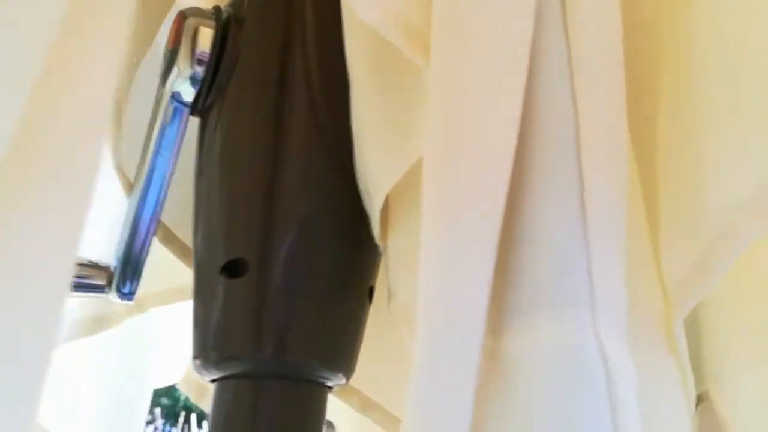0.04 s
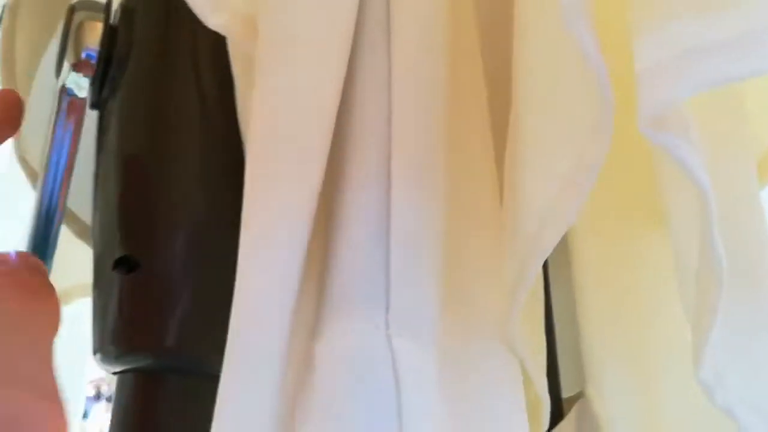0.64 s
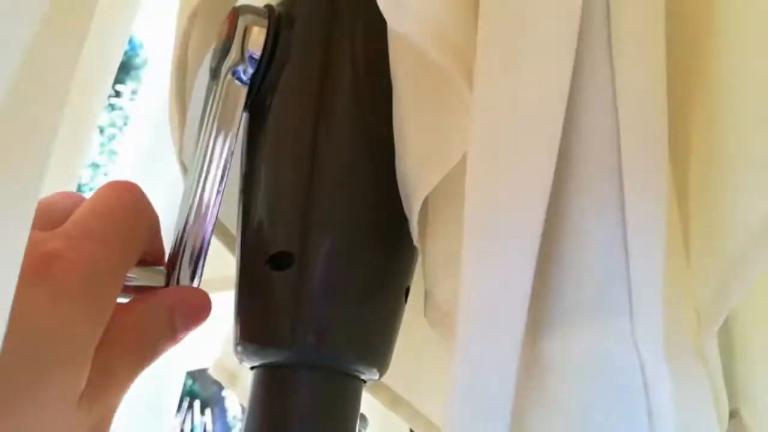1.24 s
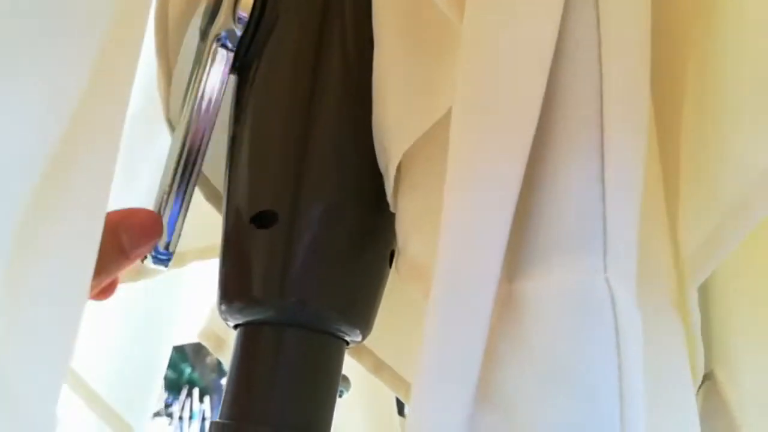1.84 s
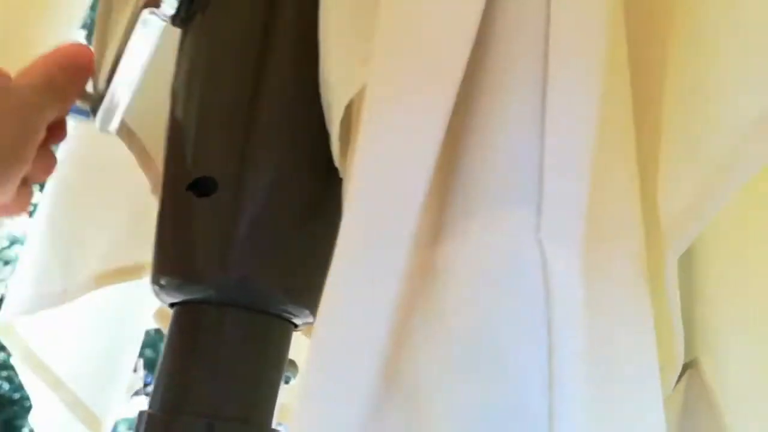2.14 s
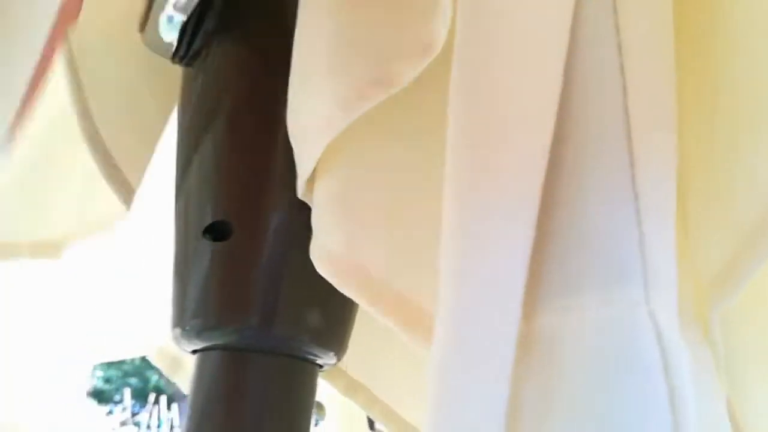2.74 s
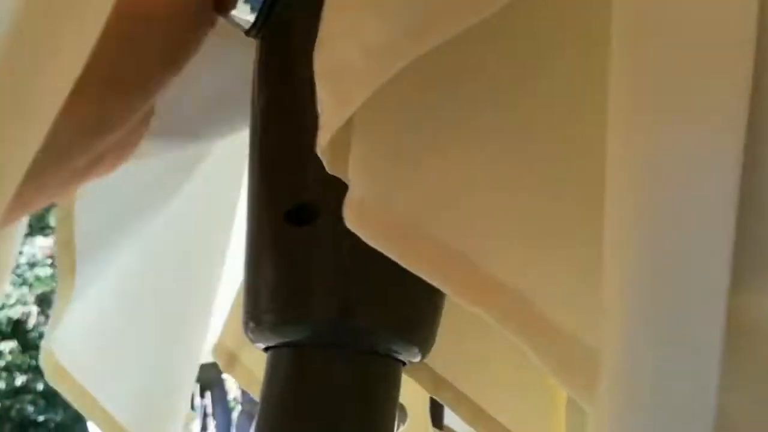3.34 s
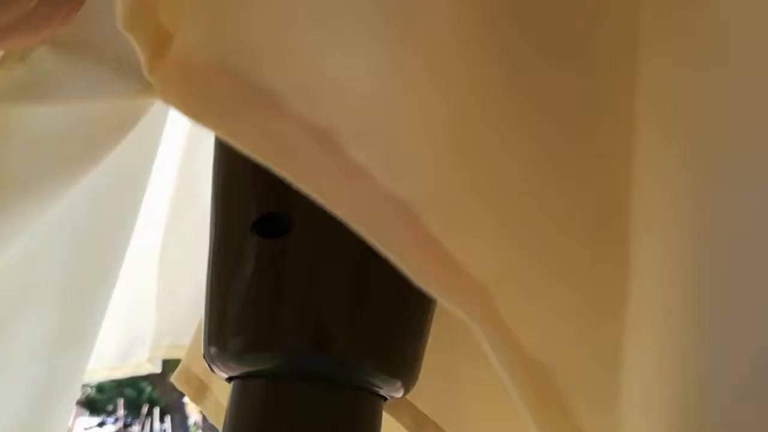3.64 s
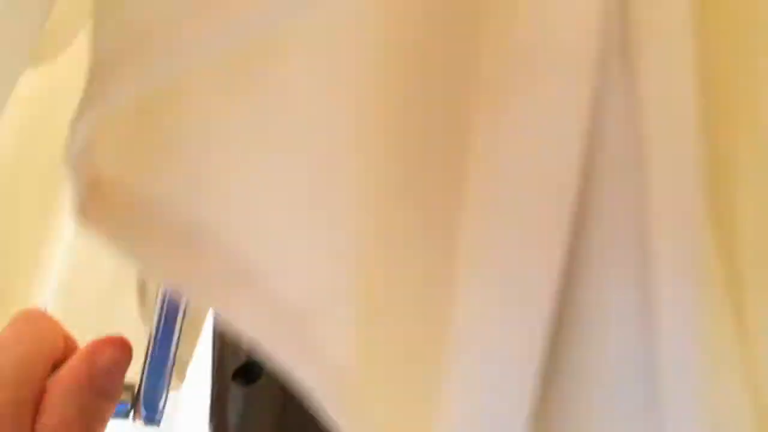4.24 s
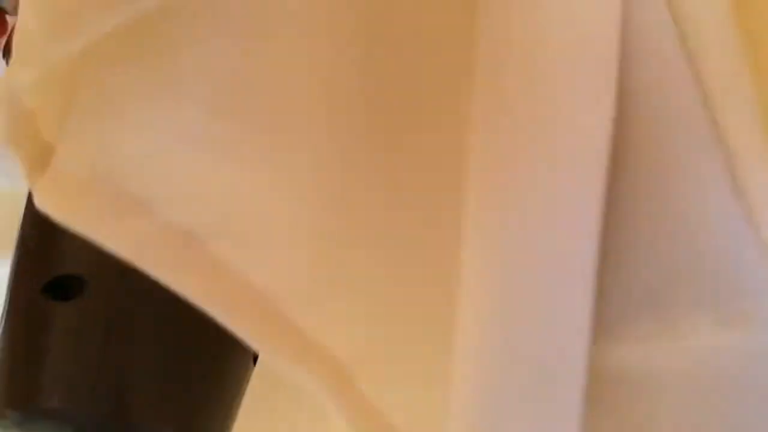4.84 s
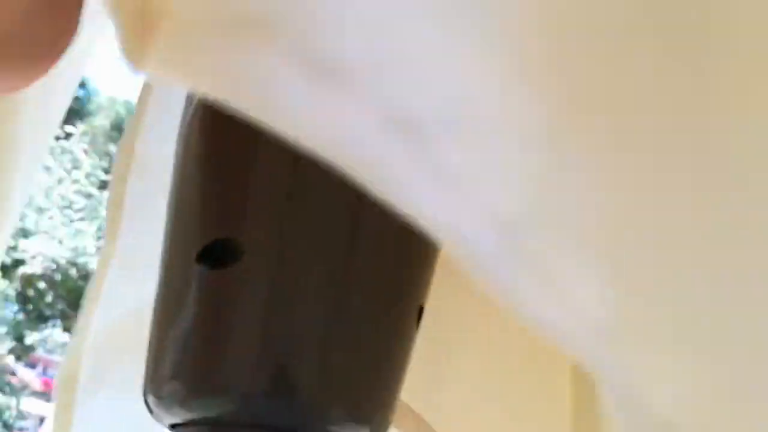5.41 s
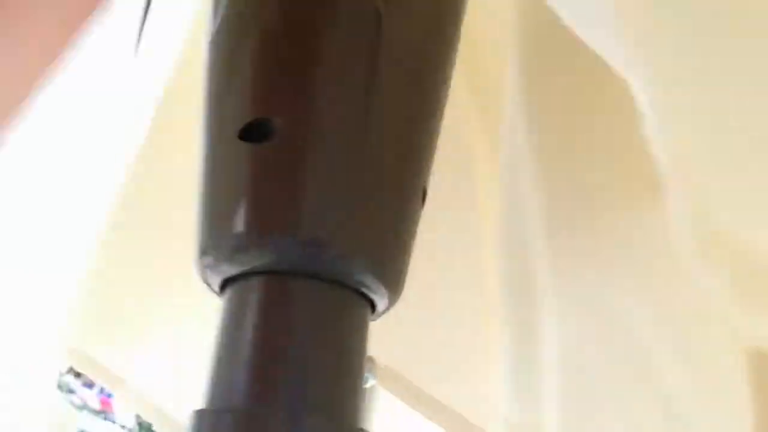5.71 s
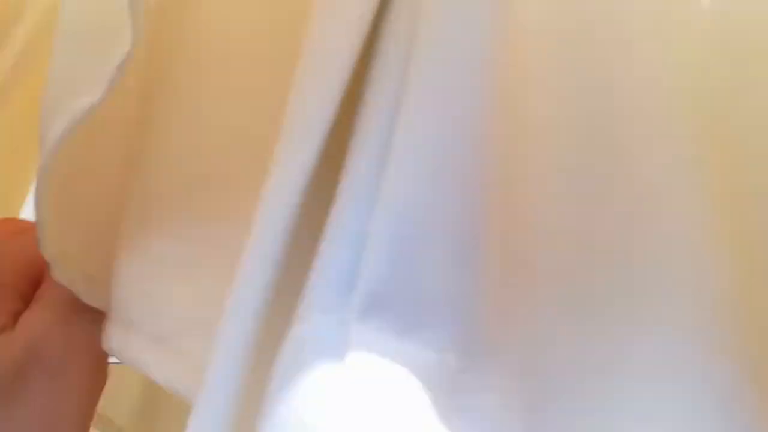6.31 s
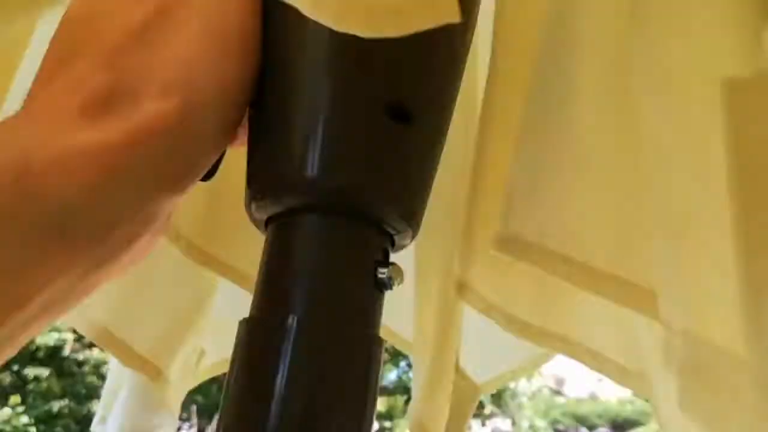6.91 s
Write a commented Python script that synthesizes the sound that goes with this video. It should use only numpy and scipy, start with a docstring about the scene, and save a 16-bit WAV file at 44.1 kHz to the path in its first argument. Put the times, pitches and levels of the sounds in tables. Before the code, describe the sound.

A parasol is cranked open close by, its ratchet clicking sharply in uneven runs while canopy cloth rustles and air rumbles softly.

```python
"""Outdoors in a garden, close to a parasol being cranked open by hand.
Canopy cloth slides in separate swishes and snags; a draught and puffs of air rumble on the microphone.
The cord scrapes in the plastic housing and a sprung pawl snaps over the ratchet teeth, rattling on after
one snap. The loose steel handle clinks now and then. Hand and cloth bump the microphone softly, and an
arm brushes past it."""
import sys
import numpy as np
from scipy import signal
from scipy.fft import rfft, irfft
from scipy.io import wavfile
from scipy.ndimage import uniform_filter1d

SR = 44100
rng = np.random.default_rng(int(sys.argv[2]) if len(sys.argv) > 2 else 0)


def output_pcm(signal):
    """Save a mono or channel-first signal as 16-bit PCM at the path in sys.argv[1].

    Samples are clipped to [-1, 1] before scaling.
    """
    pcm = np.clip(np.atleast_2d(signal).T, -1, 1) * 32767
    wavfile.write(sys.argv[1], SR, np.round(pcm).astype(np.int16))


N = 316197
TIME_S = np.arange(N) / SR


def gain_of(db):
    """Decibels to amplitude."""
    return 10 ** (np.asarray(db) / 20)


def unit_rms(x):
    """Scales to rms 1."""
    return x / np.sqrt(np.mean(x ** 2) + 1e-20)


def unit_hit(x):
    """Scales each side to the energy of 10 ms at rms 1."""
    return x * np.sqrt(SR / 100) / np.linalg.norm(x, axis=1, keepdims=True)


def at_hz(points, hz):
    """Interpolates (frequency, value) points on a log-frequency axis."""
    point_hz, value = np.transpose(points)
    return np.interp(np.log(hz + 1), np.log(point_hz + 1), value)


def follow(rows):
    """Each column of a time table at every sample."""
    time_s, *columns = np.transpose(rows)
    return [np.interp(TIME_S, time_s, column) for column in columns]


def panned(db):
    """Constant-power gains for a left-right level difference."""
    pair = gain_of(np.array([np.atleast_1d(db), -np.atleast_1d(db)]) / 2)
    return pair / np.sqrt(np.mean(pair ** 2, axis=0))


def add(mix, start_s, sound):
    """Mixes in a stereo sound."""
    part = mix[:, round(start_s * SR):][:, :sound.shape[1]]
    part += sound[:, :part.shape[1]]


def coloured(x, spectrum):
    """Filters a full-length signal, to rms 1."""
    return unit_rms(irfft(rfft(x) * gain_of(at_hz(spectrum, np.fft.rfftfreq(N, 1 / SR))), N))


def causal(x, db):
    """Minimum-phase filter: the attack is not smeared backwards."""
    size = x.shape[-1]
    cepstrum = irfft(np.log(gain_of(db)), size)
    one_sided = 1 + np.sign(size / 2 - np.arange(size))
    one_sided[0] = 1
    return irfft(rfft(x) * np.exp(rfft(cepstrum * one_sided)), size)


def noise(shared):
    """Stereo noise with a share of its power common to both sides."""
    return np.sqrt(shared) * rng.standard_normal(N) + np.sqrt(1 - shared) * rng.standard_normal((2, N))


def wander(top_hz):
    """Slow random curve, rms 1."""
    return unit_rms(irfft(rfft(rng.standard_normal(N)) * (np.fft.rfftfreq(N, 1 / SR) < top_hz), N))


def grains(per_s, spread_db):
    """Sparse tiny slips of uneven size, unequal on the two sides."""
    size = gain_of(spread_db * np.minimum(rng.exponential(1, N), 4))
    return unit_rms(size * (rng.random(N) < per_s / SR) * rng.standard_normal((2, N)))


def arch(start_s, length_s, power, lean):
    """Swell from 0 to 1 and back; low power is flat-topped, lean over 1 peaks late."""
    progress = (TIME_S - start_s) / length_s
    moving = (progress > 0) & (progress < 1)
    out = np.zeros(N)
    out[moving] = np.sin(np.pi * progress[moving] ** lean) ** power
    return out


def swells(rows, power, lean):
    """One gain curve per level column; overlapping arches add in power."""
    return np.sqrt(sum((gain_of(dbs)[:, None] * arch(start_s, length_s, power, lean)) ** 2
                       for start_s, length_s, *dbs in rows))


# Steady draught under the canopy (time [s], rumble [dB], buffet [dB])
DRAUGHT_LEVELS = [(0, -67, -76.5), (0.6, -61.5, -69), (1.4, -62.5, -76.5), (2.2, -60.5, -66),
                  (5, -54, -66.5), (7.17, -60.5, -70)]
# Puffs fanned by the canopy (start [s], length [s], rumble [dB], buffet [dB])
AIR_PUFFS = [(2.6, 0.092, -47, -56), (2.73, 0.17, -53, -68), (3.82, 0.23, -50, -44), (4.35, 0.19, -52, -62),
             (4.8, 0.2, -48, -63.5), (5.12, 0.36, -54.5, -60), (5.48, 0.23, -44, -61.5),
             (5.72, 0.38, -44.5, -58), (6.05, 0.32, -36, -50.5), (6.33, 0.18, -44.5, -62),
             (6.49, 0.28, -39.5, -69), (6.87, 0.092, -43.5, -66)]
# Air spectra (frequency [Hz], density [dB])
RUMBLE_SPECTRUM = [(12, -4), (25, -6.5), (45, -1.5), (80, -1), (120, -9.5), (200, -24.5), (600, -106)]
BUFFET_SPECTRUM = [(50, -19), (115, -1.5), (170, 2), (260, -3), (400, -12.5), (800, -53), (3000, -53)]
GARDEN_SPECTRUM = [(50, -13), (200, -13), (450, -9.5), (1000, -7.5), (3000, -11), (6000, -15.5),
                   (10000, -18.5), (15000, -20)]
def air():
    """Draught and puffs press in low lumps on the microphone, over the garden's faint wash."""
    puffs = swells(AIR_PUFFS, power=0.4, lean=0.78)
    rumbling, buffeting = np.hypot(gain_of(follow(DRAUGHT_LEVELS)), puffs)
    lumps_db = 1.5 * wander(16)
    rumble = coloured(noise(0.96), RUMBLE_SPECTRUM) * rumbling * gain_of(-0.9 + lumps_db)
    buffet = coloured(noise(0.71), BUFFET_SPECTRUM) * buffeting
    buffet *= gain_of(0.5 + lumps_db + 0.58 * wander(31))
    garden = gain_of(-70.5) * coloured(noise(0.025), GARDEN_SPECTRUM)
    return rumble + buffet + garden


# Sliding folds; taut cloth has more sheen (start [s], length [s], level [dB], sheen [dB], left-right [dB])
FOLD_SWISHES = [(0.373, 0.1, -60, 10, -1), (0.421, 0.15, -51, 25, 2.5), (0.492, 0.17, -46, 15, 3),
                (0.586, 0.094, -44.5, 13, 2), (0.698, 0.092, -49.5, -2, -2), (0.818, 0.3, -58.5, 8, 0),
                (1.113, 0.35, -60, 6, -1), (1.48, 0.89, -61.5, 1, -0.5), (1.82, 0.45, -50, 4, 1),
                (2.09, 0.42, -43.5, -7.5, 2), (2.46, 0.21, -41, 5, 1.5), (2.585, 0.15, -36.5, 10, -1),
                (3.015, 0.35, -43, -0.5, -1), (3.2, 0.87, -54.5, 12, -1.5), (3.632, 0.38, -38.5, 7, 0),
                (3.978, 0.44, -53, 10, 0), (4.34, 0.22, -38.5, 3.5, -4), (4.447, 0.34, -47.5, 13, -3),
                (4.733, 0.32, -39, -6.5, -3.5), (4.958, 0.2, -44.5, -6.5, -3),
                (5.165, 0.24, -39.5, -10, -2), (5.422, 0.3, -37.5, 3, -1), (5.673, 0.21, -47, -2, 1),
                (5.857, 0.087, -40.5, -13, 9), (5.95, 0.27, -39, -14, -5), (6.215, 0.21, -43, -1, -3.5),
                (6.294, 0.48, -51, -4, -4), (6.657, 0.54, -50.5, 1, -2)]
def folds(rest_db=-73.5):
    """Gain, sheen and pan of cloth that is never quite still; the loudest fold dominates."""
    power, sheen, side = np.full(N, gain_of(rest_db) ** 2), np.zeros(N), np.zeros(N)
    for start_s, length_s, db, sheen_db, pan_db in FOLD_SWISHES:
        swish = (gain_of(db) * arch(start_s, length_s, power=0.68, lean=1.16)) ** 2
        power += swish
        sheen += swish * sheen_db
        side += swish * pan_db
    return np.sqrt(power), sheen / power, side / power


# Treble lift of taut cloth (frequency [Hz], share of sheen [ratio])
SHEEN_SHARE = [(3800, 0.34), (4700, 0.57), (7000, 0.7), (13000, 0.67)]
def shifting(x, sheen_db, patchy_db):
    """Folds form and collapse, so patches of the rustle's spectrum come and go."""
    hz, frame_s, frames = signal.stft(x, SR, nperseg=512)
    patches = uniform_filter1d(rng.standard_normal(frames.shape), size=7, axis=1)
    patches = unit_rms(uniform_filter1d(patches, size=11, axis=2))
    lift_db = at_hz(SHEEN_SHARE, hz)[:, None] * np.interp(frame_s, TIME_S, sheen_db)
    frames *= gain_of(patchy_db * patches + lift_db - lift_db.max(0) / 2)
    return signal.istft(frames, SR, nperseg=512)[1][:, :N]


def settled(level, settle_s):
    """Cloth rustles on after a move: limits how fast the gain falls."""
    fall = TIME_S / settle_s
    return np.exp(np.maximum.accumulate(np.log(level) + fall) - fall)


# Cloth friction and dense housing resonances (frequency [Hz], density [dB])
CLOTH_SPECTRUM = [(150, -9.5), (500, -7.5), (900, -7), (1200, -4.5), (2000, -4.5), (2800, 0.5),
                  (3600, -1.5), (4600, 0), (5400, 0), (6800, -6), (9000, -14), (9800, -19.5), (15000, -27)]
HOUSING_SPECTRUM = [(150, -32), (450, -22), (620, -14.5), (750, -11.5), (980, -2.5), (1250, 5), (1650, 0.5),
                    (2100, 1), (2900, -1), (3700, -4), (5200, 0.5), (6500, -3.5), (8900, -9), (9800, -17.5),
                    (15000, -19.5)]
# Cord drawn in by the crank (time [s], level re cloth [dB])
CORD_LEVELS = [(1.7, -28), (2.0, -9), (3.4, -11), (4.9, -21), (6.1, -2), (6.6, -15)]
def canopy():
    """Cloth slides over cloth, threads catching unevenly, while the cord scrapes in the housing."""
    level, sheen_db, pan_db = folds()
    cord_gain = gain_of(follow(CORD_LEVELS)[0])
    threads = coloured(noise(0.014) + gain_of(-8.5) * grains(per_s=1500, spread_db=3.3), CLOTH_SPECTRUM)
    cord = coloured(noise(0.029) + gain_of(3) * grains(per_s=3000, spread_db=3.4), HOUSING_SPECTRUM)
    friction = (threads + cord_gain * cord) / np.hypot(1, cord_gain)
    rustle = shifting(friction, sheen_db, patchy_db=4)
    flicker_db = wander(45)
    return rustle * settled(level, settle_s=0.087) * gain_of(flicker_db - 3) * panned(pan_db)


# Cloth snags (time [s], level over 10 ms [dB], fade [s], tilt [dB/octave], left-right [dB])
CLOTH_SNAGS = [(0.541, -50, 0.015, -5, 4), (0.778, -43.5, 0.019, -2.5, 2), (0.834, -53.5, 0.012, -4.5, -4),
               (1.056, -59, 0.011, -1, -2), (1.5, -60.5, 0.012, 5, -4), (1.75, -62, 0.0091, -3, -4),
               (2.28, -51, 0.0019, -8, 15), (2.666, -40, 0.0046, 2, 0), (3.673, -44, 0.0022, -3, -3),
               (3.724, -34, 0.0053, 1, 9), (3.742, -40, 0.0016, 6, 12), (3.872, -31, 0.0011, -1.5, 4),
               (3.953, -30.5, 0.0045, 6.5, 24), (5.931, -46.5, 0.0027, 15, 18)]
def snags(slips_per_s=2500, size=4096):
    """Cloth catches and lets go: a dry, toneless clump of tiny slips."""
    out = np.zeros((2, N))
    t, hz = np.arange(size) / SR, np.fft.rfftfreq(size, 1 / SR)
    octaves = np.log2(np.clip(hz, 700, 9000) / 2500)
    for time_s, db, fade_s, tilt_db, pan_db in CLOTH_SNAGS:
        slips = rng.standard_normal((2, size)) * (0.24 + (rng.random(size) < slips_per_s / SR))
        snag = causal(slips * np.exp(-t / fade_s), at_hz(CLOTH_SPECTRUM, hz) + tilt_db * octaves)
        add(out, time_s, gain_of(db) * panned(pan_db) * unit_hit(snag))
    return out


def rattle(t, count=8, gap_s=0.0028, fall_db_per_s=1005, fade_s=0.0015):
    """Envelope of a part chattering before it seats: uneven rebounds, each weaker than the last."""
    at_s = np.cumsum(gap_s * rng.uniform(.5, 1.5, (count, 1)), axis=0)
    rebounds = gain_of(-fall_db_per_s * at_s) * np.exp(-abs(t - at_s) / fade_s) * (t > at_s)
    return np.linalg.norm(rebounds, axis=0)


def ringing(modes, t, split, start_turns, count=4):
    """Each mode is a close, beating cluster; the grip changes it a little from blow to blow."""
    hz, db, t60_s = np.transpose(modes)[:, :, None]
    spread = split * np.minimum(hz / 1500, 1) ** 2
    detune = 1 + spread * rng.uniform(-1.05, 1, (count, 2, len(hz), 1))
    turns = (hz * detune * t + start_turns).astype(np.float32)
    fade = gain_of(db + rng.standard_normal(hz.shape) - 60 * np.maximum(t, 0) / t60_s)
    return (fade * np.sin(2 * np.pi * turns).sum(0)).sum(1)


# Housing decay (frequency [Hz], t60 before division by damping [s])
HOUSING_DECAY = [(300, 0.033), (900, 0.1), (2500, 0.079), (5000, 0.052), (12000, 0.11)]
# Housing as heard at the two microphone ports (frequency [Hz], left-right [dB])
PORT_BALANCE = [(300, 5), (800, 11.5), (1150, -1.5), (2300, -3), (3200, -11), (5000, -1), (7000, 1),
                (14000, 3)]
# Arrival, mostly right port first (frequency [Hz], left lead [rad])
PORT_LEAD = [(200, 0), (650, -1.3), (950, 0), (1450, -0.5), (2200, -3), (2650, -1), (3200, 0.5), (3750, 3),
             (4500, -1.5), (5200, -1.5), (5750, -6), (6600, -5.5), (7300, -9)]
# Long waves reach both ports more in step (frequency [Hz], shared power [ratio])
PORT_COHERENCE = [(1200, 0.64), (2500, 0.22), (6000, 0.28), (10000, 0.25)]
def strikes(rows, modes, *, rise_s, crack_db, crack_s, modes_db, tail_db, tail_t60_s,
            slip_db, slip_s, ring_db, damping, split, size=8192, lead_s=0.012):
    """Each blow: a brief slip, a crack, a rattle, ringing modes and a faint tail from under the canopy."""
    t, hz = np.arange(size) / SR - lead_s, np.fft.rfftfreq(size, 1 / SR)
    age_s = np.maximum(t, 0)
    band_hz, t60_s = np.transpose(HOUSING_DECAY)
    bands = np.array([np.interp(np.log(hz + 1), np.log(band_hz), row) for row in np.eye(len(band_hz))])
    attack = 1 - np.exp(-age_s / rise_s)
    crack = gain_of(crack_db) * np.exp(-age_s / crack_s)
    decay = attack * (gain_of(-60 * age_s * damping / t60_s[:, None]) + crack)
    slip = gain_of(slip_db) * np.exp(-abs(t) / slip_s)
    tail = attack * gain_of(tail_db - 60 * age_s / tail_t60_s)
    body_shelf = at_hz([(1200, 1), (2000, 0)], hz)
    bright_shelf = at_hz([(3000, 0), (6000, 1)], hz)
    rebound_dulling_db = at_hz([(4500, -1.5), (12000, -3.5)], band_hz)[:, None]
    shared = at_hz(PORT_COHERENCE, hz)
    sides = np.array([[.5], [-.5]])
    balance_db = sides * at_hz(PORT_BALANCE, hz)
    arrival = np.exp(1j * sides * at_hz(PORT_LEAD, hz))
    start_turns = rng.random((len(modes), 1))  # same spot struck each time
    out = np.zeros((2, N))
    for time_s, db, body_db, bright_db, ring_hz, rattle_db, pan_db in rows:
        apart, diffuse = rng.standard_normal((2, 2, size))
        direct = np.sqrt(shared) * rfft(rng.standard_normal(size)) + np.sqrt(1 - shared) * rfft(apart)
        rebounds = gain_of(crack_db + rattle_db + rebound_dulling_db) * rattle(t)
        blows = (irfft(direct[:, None] * bands) * np.hypot(decay, rebounds)).sum(1)
        housing = unit_rms(causal(blows + diffuse * np.hypot(slip, tail), at_hz(HOUSING_SPECTRUM, hz)))
        tones = gain_of(modes_db) * unit_rms(attack * ringing(modes, t, split, start_turns))
        contact_db = ring_db * np.exp(-.5 * (np.log((hz + 1) / ring_hz) / 0.083) ** 2)
        colour_db = body_db * body_shelf + bright_db * bright_shelf + contact_db + balance_db
        hit = irfft(rfft(causal(housing + tones, colour_db)) * arrival)
        add(out, time_s - lead_s, gain_of(db) * panned(pan_db) * unit_hit(hit))
    return out


# Pawl drops (time [s], level over 10 ms [dB], body [dB], brightness [dB], contact ring [Hz],
# rattle [dB], left-right [dB])
PAWL_DROPS = [(1.9129, -27.5, -26, 1.5, 2980, 0, -5), (1.9715, -13.5, -11, 1, 8000, -9, -3),
              (2.2105, -14, -8.5, 0, 6170, -7, 0), (2.3554, -18, -4, 4.5, 5830, -2, 0.5),
              (2.4922, -19, 3, 8, 4680, 1.5, 1), (2.6306, -19, 2.5, 9.5, 3260, 4.5, -1),
              (2.7489, -18, -1, 8, 2510, 1, -0.5), (2.8537, -18.5, -3.5, 5, 2450, 0.5, -2),
              (2.9876, -19.5, 2.5, 4, 5070, 0, -2.5), (3.1224, -18, -2.5, 4.5, 7940, -14, -0.2),
              (3.2408, -19.5, -0.5, 3.5, 2260, 0.5, -4), (3.3492, -19, 1, 0, 3320, -5, -3),
              (3.6872, -19, 5.5, 3, 4760, 6, -3), (3.7879, -17, 2.5, 4.5, 4760, 4.5, -5.5),
              (3.8842, -17, -5, -1, 7300, -5, -5.5), (3.9824, -17.5, 1.5, 6, 4400, 0, -4.5),
              (4.1912, -16.5, 1.5, 6.5, 4400, -4, -5), (4.3672, -18, -2.5, 2, 2020, 0, -3),
              (4.5549, -18, -2, 1.5, 2070, 4, -7), (5.2104, -12, -9, 0, 7070, -3, 0),
              (5.3075, -24, -15.5, -11.5, 4640, 7, 2), (5.4687, -14.5, -1, 1, 2980, -3, -6.5),
              (5.6107, -14.5, -4.5, 2.5, 4480, 2.5, -4.5), (5.7143, -13.5, -11.5, -4, 6030, -18, -4.5),
              (5.9887, -15, -11, 2.5, 1810, -10, -5.5)]
# Modes of housing, pole and handle (frequency [Hz], level [dB], t60 [s])
PARASOL_MODES = [(721, -5, 0.076), (886, 4, 0.072), (1253, -6.5, 0.076), (1435, 4.5, 0.2),
                 (1530, -4.5, 0.21), (1974, 5.5, 0.053), (2174, 9.5, 0.05), (2767, -2, 0.059),
                 (3760, -3.5, 0.23), (3950, -5.5, 0.29), (4150, -2, 0.2), (4900, 2, 0.1), (5434, 11, 0.05),
                 (7820, -2, 0.041)]
def ratchet():
    """The sprung pawl slides off each tooth and snaps onto the next."""
    return strikes(PAWL_DROPS, PARASOL_MODES, rise_s=0.000096, crack_db=16.5, crack_s=0.0041,
                   modes_db=-7.5, tail_db=-11.5, tail_t60_s=0.2, slip_db=2, slip_s=0.0024,
                   ring_db=7, damping=2.4, split=0.0142)


# Soft contacts (time [s], envelope peak [dB], pitch [Hz], 1/e half-width [s])
SOFT_BUMPS = [(2.643, -60, 55.6, 0.014), (3.686, -28, 126, 0.0025), (5.638, -39.5, 151, 0.01),
              (5.758, -39, 232, 0.0023), (5.849, -39.5, 270, 0.0056), (5.949, -24, 60, 0.0043),
              (6.275, -29.5, 140, 0.0093), (6.395, -30.5, 167, 0.0036), (6.614, -52, 69.4, 0.0074)]
def bumps(lead_s=0.06):
    """Hand and cloth nudge the microphone; each push swells and fades within a few slow cycles."""
    out = np.zeros((2, N))
    t = np.arange(-lead_s, lead_s, 1 / SR)
    for time_s, db, hz, half_s in SOFT_BUMPS:
        push = np.exp(-(t / half_s) ** 2) * np.sin(2 * np.pi * hz * t)
        add(out, time_s - lead_s, gain_of(db) * push * panned(1))
    return out


# Handle knocks and pawl rebounds; the first two rows are the pawl (time [s], level over 10 ms [dB],
# body [dB], brightness [dB], contact ring [Hz], rattle [dB], left-right [dB])
KNOCKS_AND_REBOUNDS = [(3.357, -29, 8, 6.5, 2730, -1, 0), (3.366, -33.5, -5, -9, 2280, -2, -6),
                       (4.1558, -36.5, -4, -4, 2450, -6, -3), (4.3208, -39, -6, -8, 2200, -4, -11),
                       (4.848, -36.5, -16, -10, 3640, 2, -7), (4.861, -35.5, -8, -15, 2700, -3, -12),
                       (5.8687, -39.5, -11, -7, 4150, 9, -7), (6.258, -25, -7, -4, 3270, -10, -15),
                       (6.2815, -26, -13, 2, 3620, -7, -11), (6.292, -32.5, -12, -8, 1520, -5, 4),
                       (6.305, -38, -15, -11, 1520, 3, -5), (6.344, -40, -5.5, -1, 1120, -7, 1),
                       (6.427, -41.5, -8, -11, 4330, 1, -12), (6.436, -38.5, -4, 1, 2720, 2, -8),
                       (6.5125, -33, -2.5, 1, 3790, 2, -9.5), (6.8335, -46.5, -2, -14, 2170, 3, -3),
                       (7.0065, -38.5, -17, -5, 2830, -3, -12)]
# Steel handle modes (frequency [Hz], level [dB], t60 [s])
HANDLE_MODES = [(1260, -38, 0.15), (1457, -4, 0.16), (2240, -23, .04), (2760, -18, 0.17), (3080, 10, 0.017),
                (3330, -4, 0.098), (4260, 4.5, 0.054), (5110, 6, 0.071), (5840, -3.5, 0.054),
                (7900, -2, 0.046)]
def knocks_and_rebounds():
    """The pawl rattles after one snap, and the loose handle clinks; both shake the housing a little."""
    return strikes(KNOCKS_AND_REBOUNDS, HANDLE_MODES, rise_s=0.00022, crack_db=8, crack_s=0.004,
                   modes_db=1.5, tail_db=-14.5, tail_t60_s=0.55, slip_db=2.5, slip_s=0.0022,
                   ring_db=13.5, damping=1.2, split=0.0087)


# Arm strokes (start [s], length [s], scratch [dB], rub [dB])
ARM_BRUSHES = [(3.665, 0.13, -39.5, -52), (3.79, 0.06, -38, -58), (3.835, 0.05, -39.5, -47.5),
               (3.885, 0.14, -34, -41), (3.97, 0.073, -46.5, -38.5)]
# Brush spectra (frequency [Hz], density [dB])
SCRATCH_SPECTRUM = [(300, -28), (700, -2), (1400, 1), (2500, -1), (5000, -2), (7500, -10.5), (10000, -30),
                    (15000, -25)]
RUB_SPECTRUM = [(30, -27), (100, -30), (230, -0.5), (400, -5.5), (700, -17), (1500, -12.5), (4000, -72)]
def arm():
    """An arm drags over cloth near the left port: a scratch, and a dull rub that rocks the microphone."""
    scratching, rubbing = swells(ARM_BRUSHES, power=0.78, lean=1)
    catch_db = 0.95 * wander(84)
    crackle = noise(0.16) + gain_of(2) * grains(per_s=1300, spread_db=3.5)
    scratch = coloured(crackle, SCRATCH_SPECTRUM) * scratching * gain_of(catch_db + 1.3 * wander(250))
    rocking = np.array([[1], [-1]])  # pushes one port, pulls the other
    rub = coloured(noise(0.56), RUB_SPECTRUM) * rocking * rubbing * gain_of(4.5 + catch_db)
    return scratch * panned(8.5) + rub * panned(3.5)


def scene():
    """Stereo sum at the microphone."""
    return ratchet() + knocks_and_rebounds() + canopy() + snags() + arm() + bumps() + air()


def record(dry):
    """Hard limit just under full scale, then low-pass."""
    cutoff_hz = 15750
    lowpass = signal.firwin(255, cutoff_hz, window=("kaiser", 9), fs=SR)
    return signal.oaconvolve(np.clip(dry, -.95, .95), lowpass[None], "same")


dry = scene()
out = record(dry)
output_pcm(out)
```